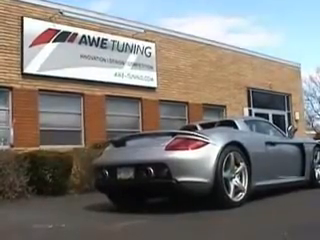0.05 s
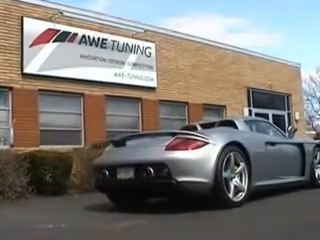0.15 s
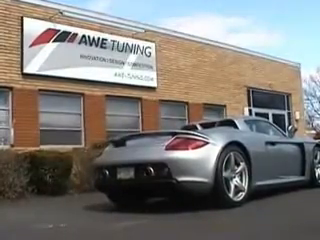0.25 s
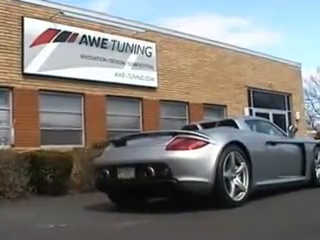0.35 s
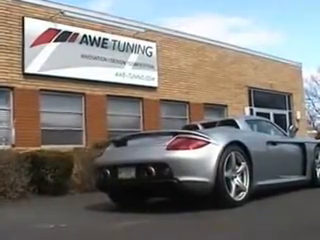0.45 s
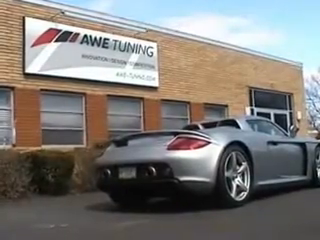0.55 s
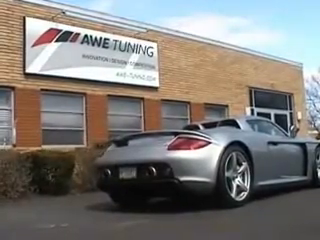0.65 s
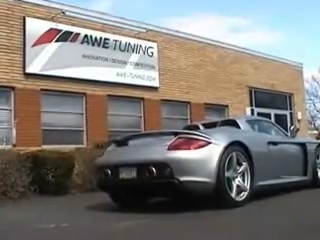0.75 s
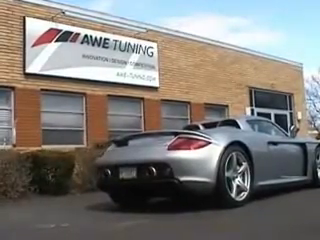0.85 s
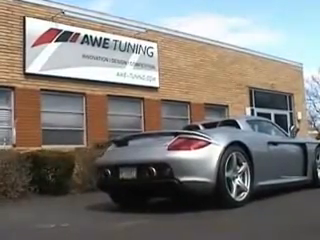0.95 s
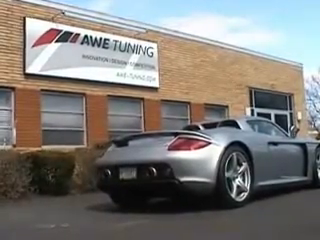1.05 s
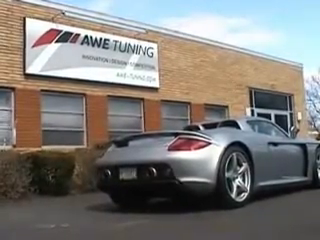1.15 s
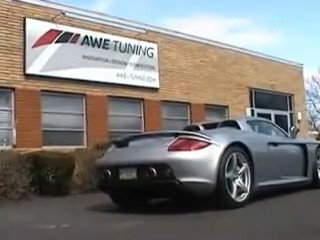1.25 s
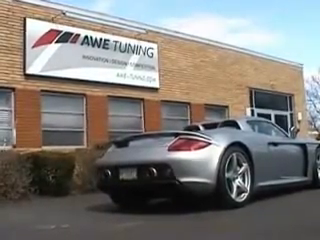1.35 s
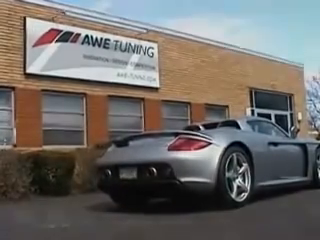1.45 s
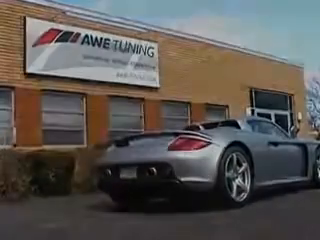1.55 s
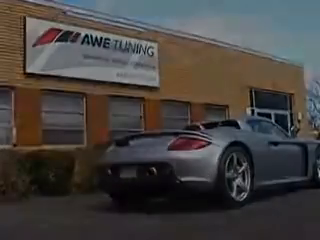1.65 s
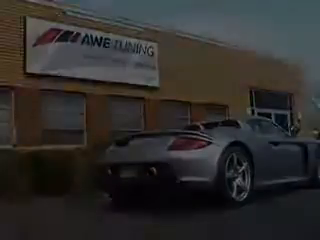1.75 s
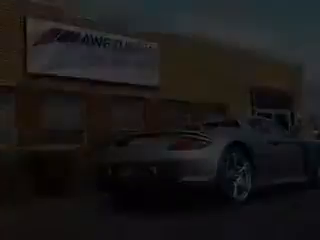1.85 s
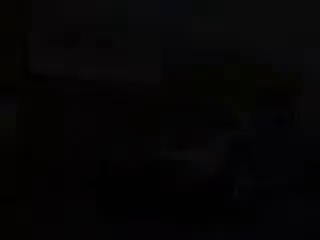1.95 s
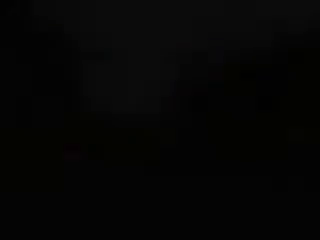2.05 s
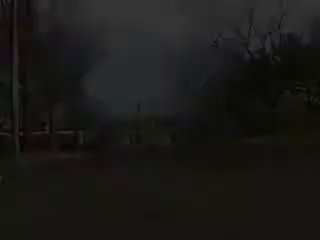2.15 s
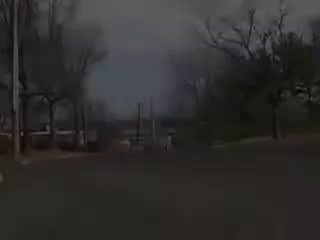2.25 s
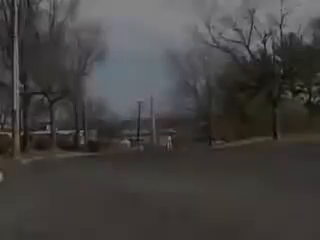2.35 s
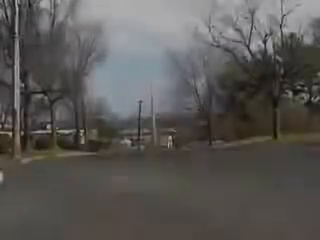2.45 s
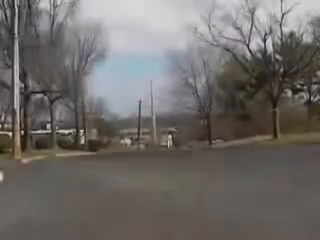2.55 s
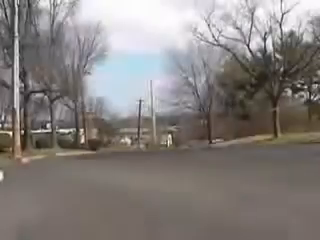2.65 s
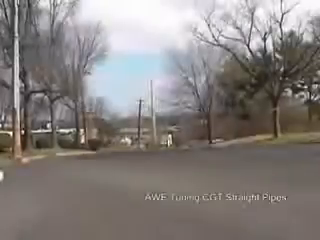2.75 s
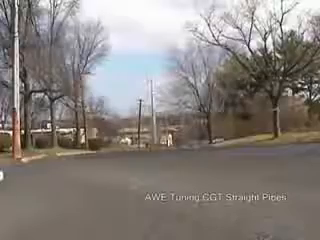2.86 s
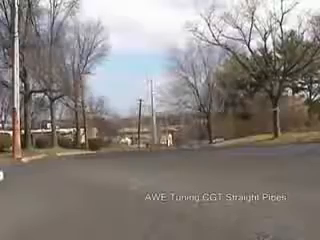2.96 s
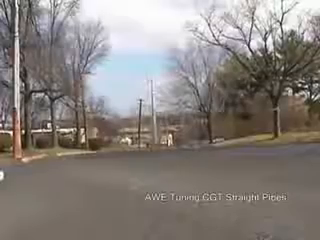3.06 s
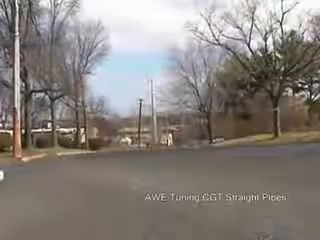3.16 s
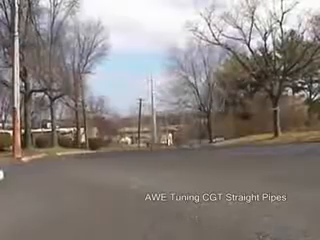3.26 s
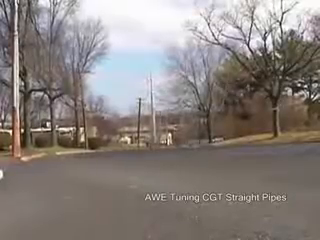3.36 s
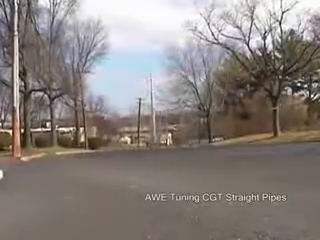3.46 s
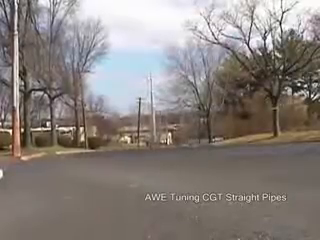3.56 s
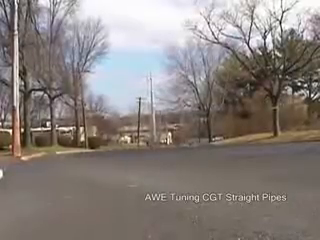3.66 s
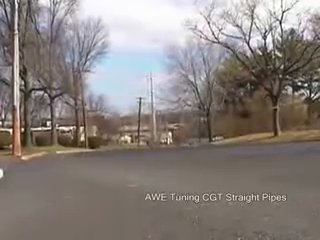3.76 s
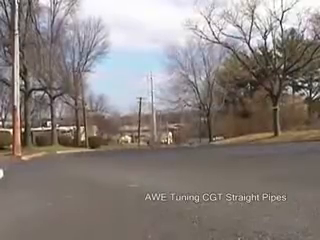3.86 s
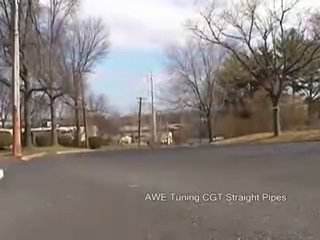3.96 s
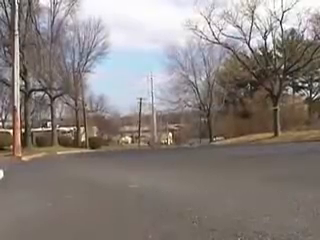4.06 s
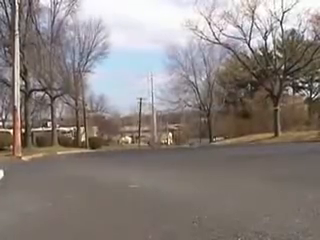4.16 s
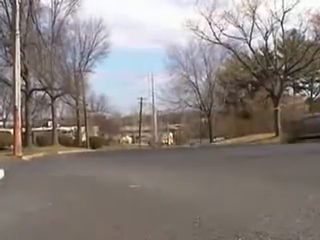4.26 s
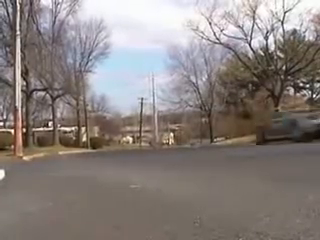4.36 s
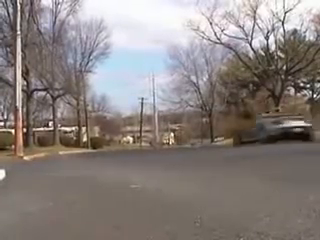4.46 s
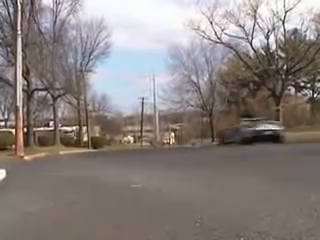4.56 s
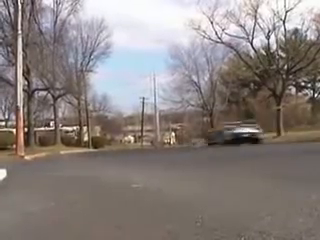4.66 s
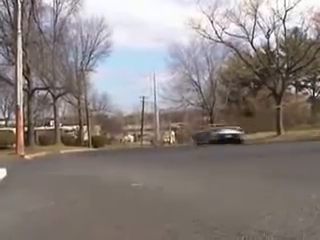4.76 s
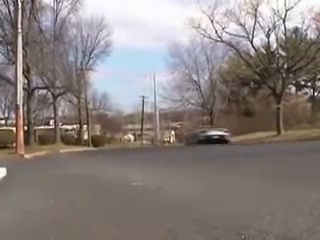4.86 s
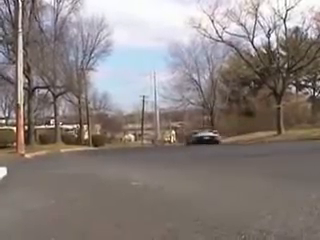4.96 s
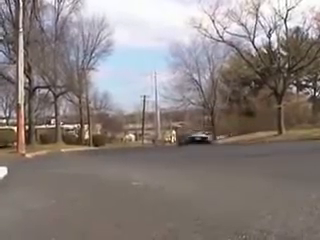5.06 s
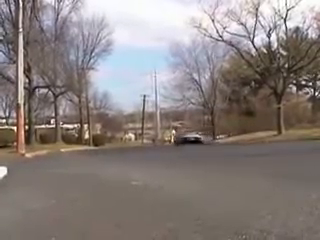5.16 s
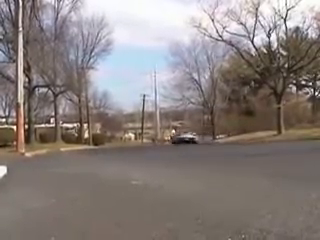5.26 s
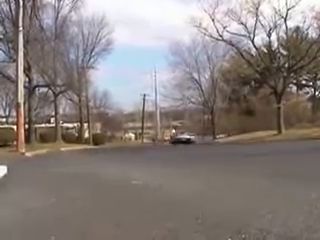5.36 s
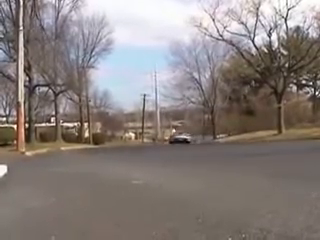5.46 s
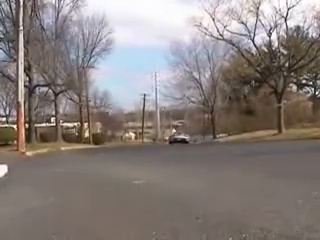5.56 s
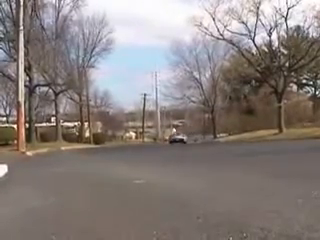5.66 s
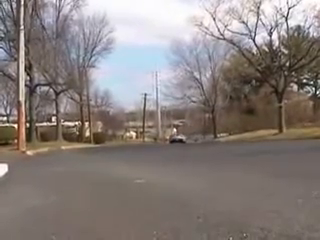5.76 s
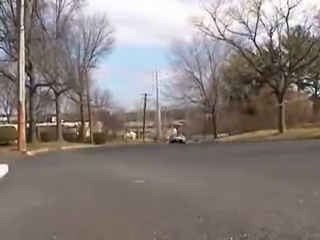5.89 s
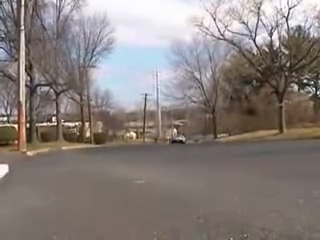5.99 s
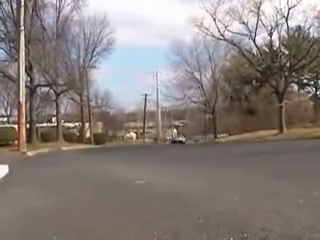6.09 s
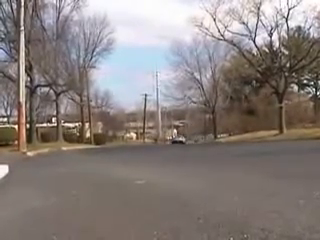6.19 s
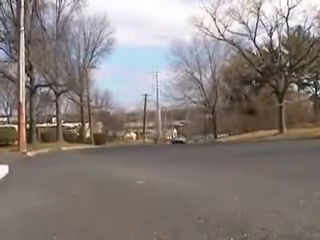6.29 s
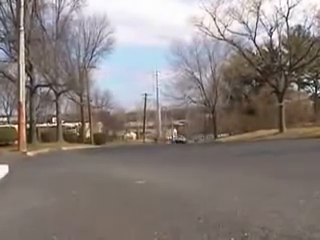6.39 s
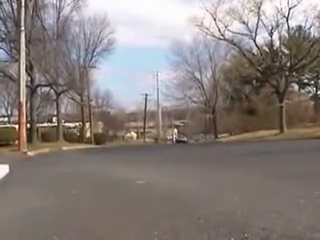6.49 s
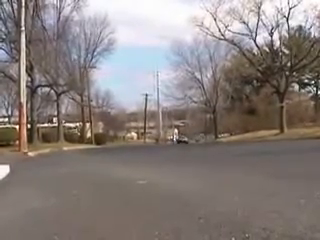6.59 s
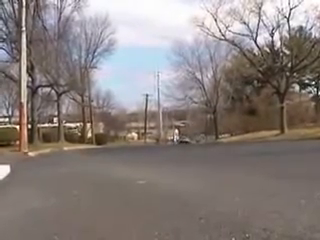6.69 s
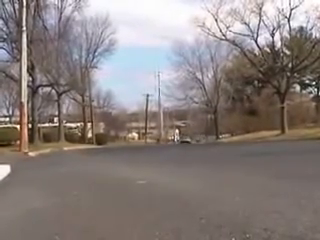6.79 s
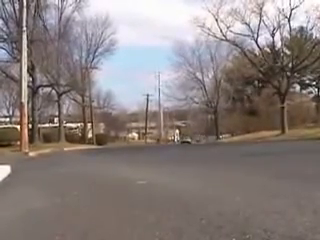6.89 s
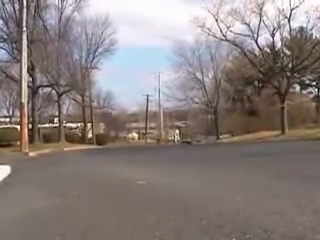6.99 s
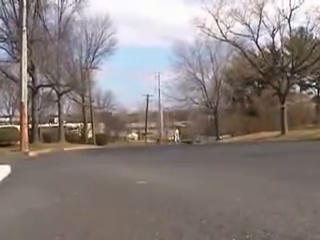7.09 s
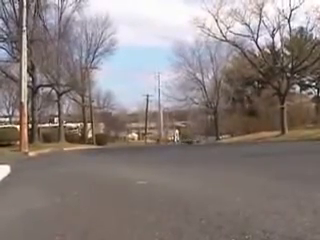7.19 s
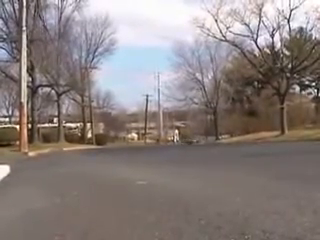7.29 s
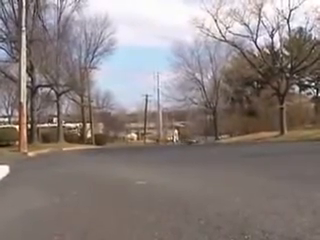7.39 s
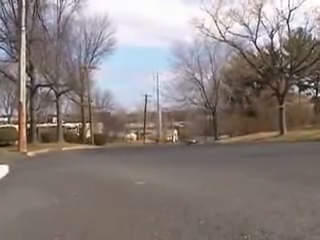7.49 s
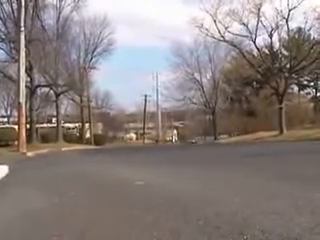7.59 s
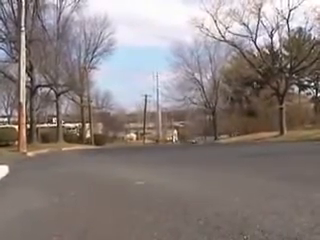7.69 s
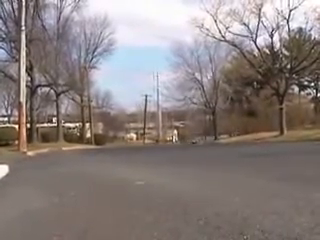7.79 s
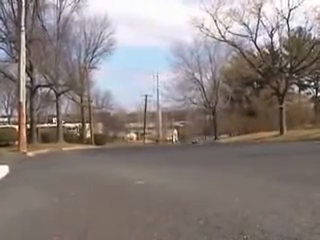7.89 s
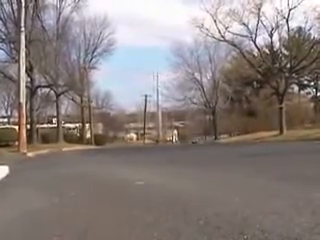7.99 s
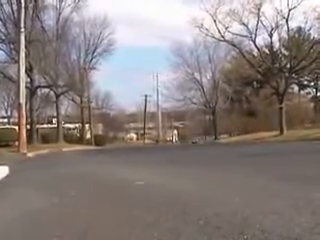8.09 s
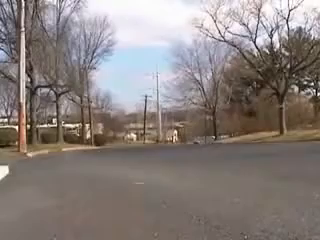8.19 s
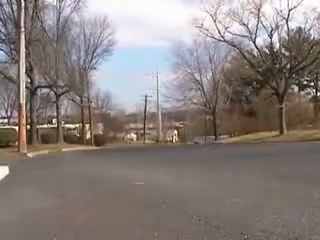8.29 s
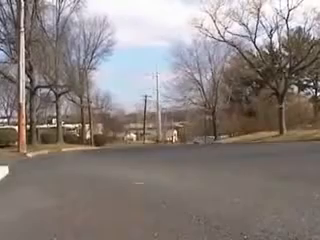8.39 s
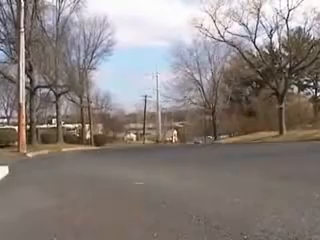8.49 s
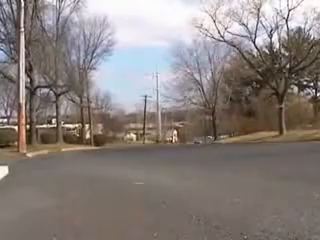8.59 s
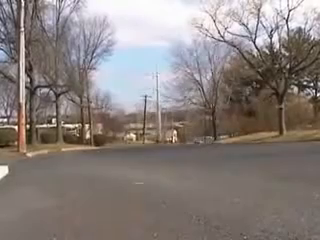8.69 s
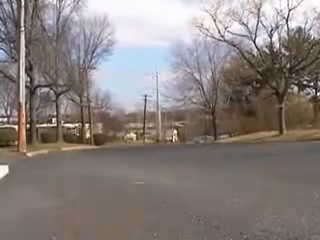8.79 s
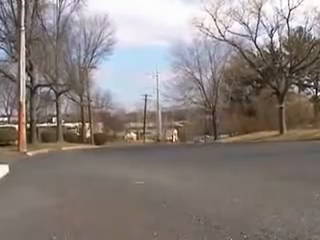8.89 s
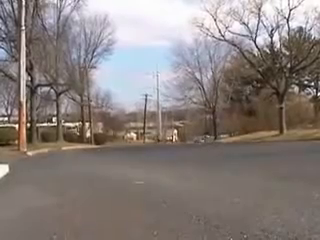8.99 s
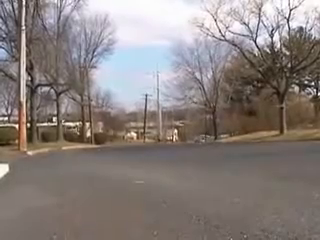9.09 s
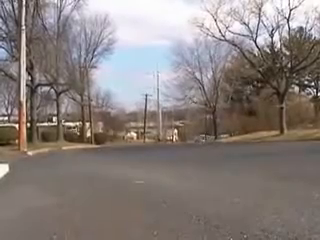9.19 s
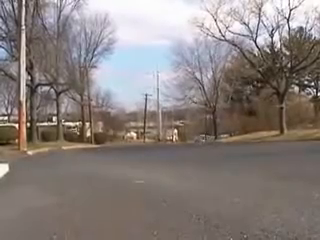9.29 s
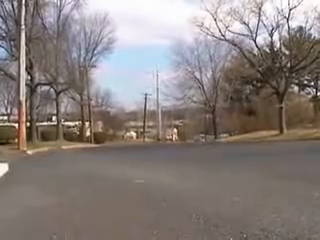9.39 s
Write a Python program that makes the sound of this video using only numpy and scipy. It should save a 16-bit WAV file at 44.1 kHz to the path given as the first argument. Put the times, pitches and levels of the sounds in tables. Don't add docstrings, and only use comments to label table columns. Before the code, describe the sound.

A sports car's raspy exhaust settles from a rev to a low idle, fades out, then the car roars past, screams away, pops and upshifts.

```python
import sys
import numpy as np
from scipy import signal
from scipy.fft import rfft, irfft, next_fast_len
from scipy.io import wavfile
from scipy.ndimage import uniform_filter1d, map_coordinates

SR = 44100
rng = np.random.default_rng(int(sys.argv[2]) if len(sys.argv) > 2 else 0)


def to_wav(sig):
    pcm = np.clip(np.atleast_2d(sig), -1, 1) * 32767
    pcm = np.round(pcm).astype(np.int16)
    wavfile.write(sys.argv[1], SR, pcm.T)


def convert_level_to_amplitude(level_db):
    exponent = np.asarray(level_db, float) / 20
    return 10 ** exponent


N = 416304
FLOORED_S, PASS_S = 3.27, 4.56

# (time [s], level [dB])
PARKED_LEVEL = [
    (0, -23),
    (.15, -28),
    (.26, -33),
    (.47, -42.5),
    (1.1, -44),
    (1.55, -47),
    (1.86, -51.5),
    (2.09, -58.5),
]
# (frequency [Hz], width [Hz], level [dB])
TAILPIPE_MODES = [(107, 90, -5), (153.8, 48.5, 4.5), (266, 65, -1), (372, 71, -5), (466, 102, -7),
                  (603, 80, -6.5)]
# (firing rate [Hz], size [0-1])
WEAK_BANK_SIZE = [(43, 0.88), (63, 0.1)]
# (frequency [Hz], density [dB per Hz])
IDLE_RUMBLE_SPECTRUM = [(12, -26), (20, -1), (97, -6), (151, -5.5), (189, -13.5), (444, -17), (555, -19.5),
                        (1200, -40.5), (1560, -59), (2640, -120)]
# (frequency [Hz], density [dB per Hz])
IDLE_HISS_SPECTRUM = [(470, -35), (800, 0.5), (1520, -10.5), (2040, -13), (2250, -10), (3160, -14),
                      (4850, -20), (7580, -19), (10200, -35), (13300, -77), (22000, -120)]
# (time [s], peak level [dB])
BURBLE_BURNS = [(0.219, -20.5), (0.231, -21), (0.238, -26), (0.253, -21), (0.268, -20.5), (0.331, -27),
                (0.365, -30)]
# (frequency [Hz], width [Hz], level [dB])
BURBLE_MODES = [(175, 53, -4), (271, 40, -1.5), (440, 95, 1.5), (627, 66, -5)]
# (time [s], frequency [Hz], level [dB])
ECHO_PATH = [(2.1, 147.3, -91), (2.274, 155.3, -58.5), (2.604, 161.9, -46.5), (3.222, 164.8, -44.5),
             (3.39, 183.1, -59), (3.466, 177, -46.5), (3.6, 183.6, -41.5)]
# (multiple [-], level [dB])
ECHO_HARMONICS = [(1, 6), (2, -3), (3, 1), (4, -7.5), (5, -16)]
# (time [s], firing rate of one bank [Hz])
BANK_RATE = [(2.119, 153.4), (2.43, 153), (2.73, 172.3), (3.36, 196.6), (3.75, 208.2), (4.28, 206.4),
             (4.779, 215.3), (5.32, 229.3), (6.09, 259.6), (6.69, 290.1), (7.235, 319), (7.725, 168),
             (7.795, 258.6), (7.945, 222.8), (8.031, 233.7), (8.331, 237.7), (8.791, 235.6), (9.44, 218)]
# (time [s], swing [Hz], decay [s])
DRIVELINE_JOLTS = [(5.479, 6, 0.17), (8.072, 5, 0.25), (8.351, -10, 0.061)]
# (time [s], gas level [dB], nearer bank's note over it [dB],
# both banks' note over it [dB], bite of the pipes [dB])
ROAD_LEVELS = [(2.12, -59.5, -1, -8, -32), (2.5, -45.5, 4.5, 0, -21.5), (2.8, -38, 9, -9.5, -21),
               (3.35, -32.5, 8.5, -7, -26.5), (3.8, -32.5, 12.5, 5.5, -23), (3.95, -26.5, 10.5, 0.5, -12),
               (4.2, -18.5, 5, 4.5, -12), (4.5, -18.5, 3.5, 2, -7.5), (4.8, -22, -1, 1, -12.5),
               (5.3, -26, 3, 7, -16), (5.8, -25.5, -7, 9.5, -16.5), (6.55, -22.5, -7.5, 8.5, -12.5),
               (7.3, -26.5, -6, 9, -14), (7.72, -34.5, -6.5, 9, -33), (7.82, -28.5, -4.5, 11.5, -21),
               (8.43, -27.5, -9, 10, -22), (8.6, -31.5, -10, 7.5, -25), (9.44, -36, 0, 10.5, -35)]
# (time [s], level [dB], width [s])
BITE_SPURTS = [(3.1, -6, 0.096), (3.89, 3.5, 0.025), (5.47, 3, .09), (7.3, 1, 0.041), (7.79, 4.5, .03),
               (8.4, 4.5, .06)]
# (start [s], end [s], loss of note [dB], loss of rasp [dB], skips over the gas [dB])
THROTTLE_LIFTS = [
    (7.247, 7.326, 16, 8, -22),
    (7.305, 7.756, 7.5, 16, -5),
    (8.468, 8.631, 23, 13, -17),
]
# (frequency [Hz], level [dB])
PIPE_COLOUR = [(450, 7.5), (560, -5), (640, 8), (720, 6), (800, 0.5), (900, 0.5), (1300, -7)]
# (time [s], level [dB], width [s])
ROAD_CANCELS = [
    [(2.79, -13, 0.029), (2.94, -6, 0.021), (7.93, -18, .05)],
    [(4.66, -8, .07)],
    [(3.62, -8, 0.27), (4.17, 4.5, 0.11), (4.39, -11, 0.077), (5.51, -11, 0.024), (6.02, -15, 0.096)],
    [(2.5, -13, 0.47), (5.53, -13, 0.057), (6.2, -4.5, 0.24), (7.1, -7.5, .2)],
]
# (frequency [Hz], level [dB])
RASP_SPECTRUM = [(410, -24), (700, 9), (1060, 6.5), (1680, -6), (2150, -16.5), (3120, -29.5), (3670, -36),
                 (7000, -50.5), (11700, -63), (19800, -120)]
# (multiple of engine cycle [-], level [dB])
CYCLE_HARMONICS = [(1, -25.5), (2, -37), (3, -44), (4, -35), (5, -13), (6, -24.5), (7, -39), (8, -16),
                   (9, -9.5), (10, 0), (11, -15), (12, -18), (13, -19.5), (14, -23.5), (15, -19),
                   (16, -22.5), (17, -31)]
# (frequency [Hz], density [dB per Hz])
BOOM_SPECTRUM = [(150, -40), (215, 2.5), (243, 6.5), (275, 9.5), (400, -56.5)]
# (multiple of engine cycle [-], level [dB])
MISFIRE_HARMONICS = [(6, 1), (8, -3), (12, -9.5), (14, -18.5)]
# (frequency [Hz], density [dB per Hz])
JET_SPECTRUM = [(500, -38.5), (1500, 10.5), (2500, 7), (4000, 4.5), (7000, -12.5), (10000, -53.5),
                (13000, -56.5)]
# (frequency [Hz], density [dB per Hz])
ROAR_SPECTRUM = [(60, -42.5), (120, -3.5), (190, -3.5), (240, -0.5), (300, -2.5), (450, -2.5), (700, -4.5),
                 (1200, -10.5), (2500, -24), (5000, -54.5)]
# (frequency [Hz], density [dB per Hz])
INTAKE_SPECTRUM = [(3000, -41), (5500, -0.5), (7500, -0.5), (10000, -13), (13000, -55)]
# (start [s], end [s], delay at start [ms], share [-])
KERB_REFLECTIONS = [
    (3.84, 4.29, .46, .6),
    (4.27, 4.85, .47, 1),
]
# (frequency [Hz], density [dB per Hz])
WIND_SPECTRUM = [(10, -14), (30, 2.5), (60, -4), (110, -5.5), (200, -73)]
# (time [s], level [dB], width [s])
WIND_GUSTS = [(3.19, 9, 0.054), (3.95, 10, .25), (4.65, 3, .08), (5.6, 4.5, 0.22), (6.2, 5.5, 0.35),
              (6.63, 6.5, .05), (8.52, -18, .08), (9, -4.5, 0.34)]
# (time [s], peak level [dB], crack level [dB])
LATE_BURNS = [(7.24, -7, -35), (7.253, -7, -26), (7.262, -11, -24), (7.273, -7, -21), (7.295, -20, -9),
              (7.318, -21, -6.5), (7.337, -25, -6.5), (7.356, -23, -31), (8.526, -26, -29),
              (8.548, -23, -27), (8.569, -16.5, -35), (8.593, -13.5, -31), (8.607, -14, -26)]
# (frequency [Hz], width [Hz], level [dB])
BANG_MODES = [(324, 110, 10), (600, 400, 4)]


def unit(x):
    return x / np.sqrt(np.mean(x ** 2) + 1e-20)


def along(points, hz):
    f, v = np.transpose(points)
    return np.interp(np.log(hz + 1), np.log(f + 1), v)


def curves(rows):
    s, *cols = np.transpose(rows)
    return [np.interp(np.arange(N) / SR, s, c) for c in cols]


def sounding(rows):
    t = np.arange(N) / SR
    inside = (t >= rows[0][0] - .006) & (t <= rows[-1][0] + .007)
    return uniform_filter1d(1. * inside, size=441)


def wobble(rate):
    knots = rng.standard_normal(int(N * rate / SR) + 4)
    return map_coordinates(knots, [np.arange(N) * rate / SR], order=1)


def bumps(rows):
    t = np.arange(N) / SR
    return sum(db * np.exp(-((t - s) / width) ** 2) for s, db, width in rows)


def filtered(x, response):
    m = next_fast_len(N + SR // 2)
    return irfft(rfft(x, m) * response(np.fft.rfftfreq(m, 1 / SR)), m)[..., :N]


def resonances(modes):
    def response(f):
        return sum((-1) ** k * convert_level_to_amplitude(db) * 1j * f * w / (c * c - f * f + 1j * f * w)
                   for k, (c, w, db) in enumerate(modes))
    return response


def noise(spectrum, gate=1):
    return unit(filtered(gate * rng.standard_normal(N), lambda hz: convert_level_to_amplitude(along(spectrum, hz))))


def tones(turns, levels, flutter_db, rate):
    total = np.zeros(N)
    for k, db in levels:
        gain = convert_level_to_amplitude(db + flutter_db * wobble(rate)) * np.sqrt(2)
        total += gain * np.cos(2 * np.pi * round(k) * turns + wobble(rate / 2))
    return total


def blows(rows, gain_db, soft_hz):
    x = np.zeros(N)
    for s, db, *_ in rows:
        x[round(s * SR)] = -convert_level_to_amplitude(db + gain_db)
    return filtered(x, lambda hz: 1 / (1 + 1j * hz / soft_hz) ** 2)


def parked():
    t = np.arange(N) / SR
    blip = np.exp(-(t / .31) ** 1.15)
    bank_hz = 37.1 + (107.8 - 37.1) * blip
    exhaust_db, = curves(PARKED_LEVEL)
    firing = np.floor(np.cumsum(2 * bank_hz) / SR + 0.046 * wobble(60)).astype(int)
    firing = np.maximum.accumulate(firing).clip(0)
    cylinder = convert_level_to_amplitude(rng.normal(0, .8, 10))[firing % 10]
    bank = np.where(firing % 2, along(WEAK_BANK_SIZE, bank_hz), 1)
    size = cylinder * bank * convert_level_to_amplitude(0.62 * rng.standard_normal(firing[-1] + 1)[firing])
    pulses = filtered(np.diff(firing, prepend=0) * size, lambda hz: resonances(TAILPIPE_MODES)(hz) ** 2)
    power = np.abs(uniform_filter1d(pulses ** 2, size=SR // 8))
    pulses = (1 - np.exp(-t / 0.041)) * pulses / np.sqrt(power + 1e-12)
    rumble = convert_level_to_amplitude(-4.0 + 2.6 * wobble(13.7)) * noise(IDLE_RUMBLE_SPECTRUM)
    hiss = convert_level_to_amplitude(-19.5 - 5.5 * blip + wobble(60)) * noise(IDLE_HISS_SPECTRUM)
    exhaust = convert_level_to_amplitude(exhaust_db) * (pulses + hiss) + convert_level_to_amplitude(np.minimum(exhaust_db, -33)) * rumble
    burble = filtered(blows(BURBLE_BURNS, gain_db=38, soft_hz=600), resonances(BURBLE_MODES))
    return sounding(PARKED_LEVEL) * exhaust + burble


def building():
    hz, db = curves(ECHO_PATH)
    echo = tones(np.cumsum(hz) / SR, ECHO_HARMONICS, flutter_db=3, rate=45)
    return sounding(ECHO_PATH) * convert_level_to_amplitude(db) * echo


def crank():
    t, shudder_hz = np.arange(N) / SR, 6.3
    s, hz = np.transpose(BANK_RATE)
    bank_hz = np.exp(np.interp(t, s, np.log(hz)))
    for start, swing_hz, dies_s in DRIVELINE_JOLTS:
        since = np.maximum(t - start, 0)
        bank_hz = bank_hz + swing_hz * np.sin(2 * np.pi * shudder_hz * since) * np.exp(-since / dies_s)
    return bank_hz


def exhaust_note(turns, bank_hz, side_db, both_db, bite_db, note_loss, gone_s):
    t = np.arange(N) / SR
    laden = sounding([(THROTTLE_LIFTS[1][1],), (THROTTLE_LIFTS[2][0],)])
    third_db = 1 + 0.5 * bite_db + 0.52 * side_db + along(PIPE_COLOUR, 3 * bank_hz)
    fourth_db = 12 + bite_db + along(PIPE_COLOUR, 4 * bank_hz)
    tone_db = [side_db, both_db - note_loss,
               third_db - 1.2 * note_loss + 3 * laden, fourth_db - 1.1 * note_loss + laden]
    flutter_db = [1.6 + .6 * gone_s + 2 * (t < FLOORED_S), 1.4, 1.5, 1.2]
    fading_db, lag_rad = [1.1, 0.39, 1.7, 0.78], [0.18, 1.12, 2.64, 3.52]
    note = np.zeros(N)
    for k in range(4):
        level_db = tone_db[k] + bumps(ROAD_CANCELS[k])
        level_db = level_db + flutter_db[k] * wobble(25) + fading_db[k] * wobble(9)
        note += convert_level_to_amplitude(level_db) * np.cos(2 * np.pi * (k + 1) * turns + lag_rad[k])
    return np.sqrt(2) * note


def exhaust_rasp(turns, bank_hz, bite_db, throttle_db, rasp_loss, gone_s):
    rasp_db = 9.5 + 1.28 * bite_db + uniform_filter1d(throttle_db, size=SR // 12) - rasp_loss
    rasp_db = rasp_db + 6 * np.clip(gone_s - .6, 0, 1)
    odd_db = np.maximum(-2 - 8 * np.maximum(gone_s - .5, 0), -12)
    tilt_db = 1 + .25 * np.maximum(throttle_db, 0)
    rasp = np.zeros(N)
    for k in range(5, 28):
        gain = convert_level_to_amplitude(along(RASP_SPECTRUM, k * bank_hz[::64]) + tilt_db[::64] * np.log2(k / 9))
        gain = np.interp(np.arange(N), np.arange(0, N, 64), gain)
        flutter = convert_level_to_amplitude(k % 2 * odd_db + 1.6 * wobble(12) + 2.2 * wobble(60))
        rasp += gain * flutter * np.sin(2 * np.pi * k * turns + .3 * wobble(20))
    return convert_level_to_amplitude(rasp_db) * rasp


def cylinder_throb(turns):
    t = np.arange(N) / SR
    unequal = [(k, db) for k, db in CYCLE_HARMONICS if round(k) % 5]
    throb = tones(turns / 5, unequal, flutter_db=1.5, rate=12) + convert_level_to_amplitude(-12.5) * noise(BOOM_SPECTRUM)
    return convert_level_to_amplitude(-15.5 + 3.5 * (t - 3.5) + 3.5 * (t > THROTTLE_LIFTS[2][1])) * throb


def misfires(turns, shut):
    level = sum(gate * convert_level_to_amplitude(row[4]) for gate, row in zip(shut, THROTTLE_LIFTS))
    return level * tones(turns / 5, MISFIRE_HARMONICS, flutter_db=3.5, rate=45)


def gas_noise(turns, bite_db):
    t = np.arange(N) / SR
    puff = .45 + np.exp(-4.5 * (turns % 1))
    jet = convert_level_to_amplitude(bite_db + 2.0 + 1.2 * wobble(40)) * noise(JET_SPECTRUM, puff)
    uneven_db = 2 * (t < FLOORED_S + .3) * wobble(18)
    return jet + convert_level_to_amplitude(-3.5 + 1.3 * wobble(30) + uneven_db) * noise(ROAR_SPECTRUM)


def intake(bite_db, throttle_db, gone_s):
    level_db = -9.5 + 0.37 * uniform_filter1d(throttle_db, size=SR // 20) + 0.57 * bite_db
    level_db = level_db - 9.5 * (1 - np.exp(-gone_s / 0.062)) - 0.5 * gone_s
    return convert_level_to_amplitude(level_db + 1.2 * wobble(6.4)) * noise(INTAKE_SPECTRUM)


def kerb(x):
    t = np.arange(N) / SR
    treble = filtered(x, lambda hz: hz ** 4 / (hz ** 4 + 1400 ** 4))
    for start, end, first_ms, share in KERB_REFLECTIONS:
        late_ms = np.clip(first_ms + 1.05 * (t - start), 0, 1.1)
        u = np.clip((t - start) / (end - start), 0, 1)
        fade = np.clip(8 * u, 0, 1) * np.sqrt(1 - u ** 2)
        copy = map_coordinates(treble, [np.arange(N) - late_ms * SR / 1000], order=1)
        x = x - share * fade * copy
    return x


def driving():
    t, bank_hz = np.arange(N) / SR, crank()
    gas_db, side_db, both_db, bite_db = curves(ROAD_LEVELS)
    bite_db = bite_db + bumps(BITE_SPURTS)
    gone_s = np.maximum(t - PASS_S, 0)
    shut = [sounding([(start,), (end,)]) for start, end, *_ in THROTTLE_LIFTS]
    note_loss = sum(gate * row[2] for gate, row in zip(shut, THROTTLE_LIFTS))
    rasp_loss = sum(gate * row[3] for gate, row in zip(shut, THROTTLE_LIFTS))
    note_loss = uniform_filter1d(note_loss, size=SR // 40)
    turns = np.cumsum(bank_hz + 0.587 * wobble(40) + 2.5 * sum(shut) * wobble(50)) / SR
    surge_db = 16.5 * np.exp(-np.abs(t - FLOORED_S) / 0.46)
    throttle_db = np.where(t < FLOORED_S, -2.5, surge_db)
    throttle_db = throttle_db - 15 * (t > THROTTLE_LIFTS[0][0])
    note = exhaust_note(turns, bank_hz, side_db, both_db, bite_db, note_loss, gone_s)
    rasp = exhaust_rasp(turns, bank_hz, bite_db, throttle_db, rasp_loss, gone_s)
    engine = note + cylinder_throb(turns) + misfires(turns, shut)
    engine = engine + kerb(rasp + gas_noise(turns, bite_db)) + intake(bite_db, throttle_db, gone_s)
    return -sounding(ROAD_LEVELS) * convert_level_to_amplitude(gas_db) * engine


def wind():
    level_db = -40.5 + 0.67 * (curves(ROAD_LEVELS)[0] + 30) + bumps(WIND_GUSTS) + 0.64 * wobble(13)
    return sounding(ROAD_LEVELS) * convert_level_to_amplitude(level_db) * noise(WIND_SPECTRUM)


def pops():
    cracks, t = np.zeros(N + SR), np.arange(SR // 20) / SR
    for s, db, crack_db in LATE_BURNS:
        crack = convert_level_to_amplitude(db + crack_db + 3 - 60 * t / 0.019) * rng.standard_normal(len(t))
        cracks[round(s * SR):][:len(t)] += crack
    thumps = filtered(blows(LATE_BURNS, gain_db=30.5, soft_hz=950), resonances(BANG_MODES))
    return thumps + filtered(cracks[:N], lambda hz: convert_level_to_amplitude(along(JET_SPECTRUM, hz)))


def scene():
    hiss = convert_level_to_amplitude(-83) * rng.standard_normal(N)
    return (parked() + building() + driving() + wind() + pops() + hiss)[None]


def low_pass(x):
    return signal.sosfilt(signal.butter(12, 10370, fs=SR, output="sos"), x)


def record(dry):
    x = dry * convert_level_to_amplitude(0.5) * np.clip((N - np.arange(N)) / (SR / 1000), 0, 1)
    x = x / (1 + np.abs(x / np.where(x > 0, .28, .25)) ** 3.5) ** (1 / 3.11)
    x = filtered(x, lambda hz: (1j * hz + 8) / (55 + 1j * hz) / (1 + (hz / 10300) ** 40))
    return low_pass(x)


dry = scene()
out = record(dry)
to_wav(out)
```